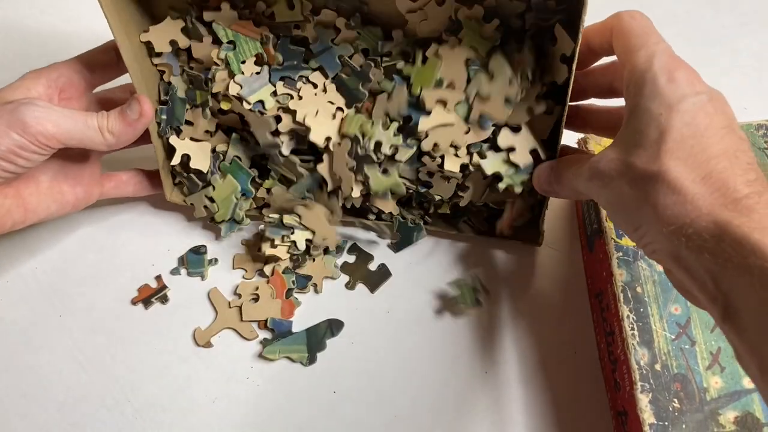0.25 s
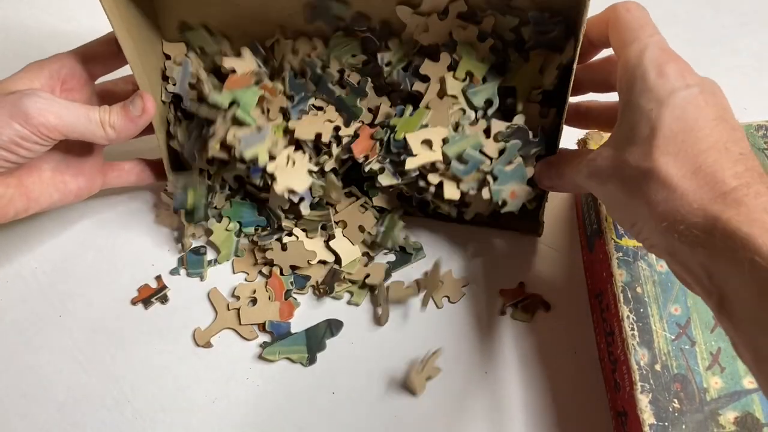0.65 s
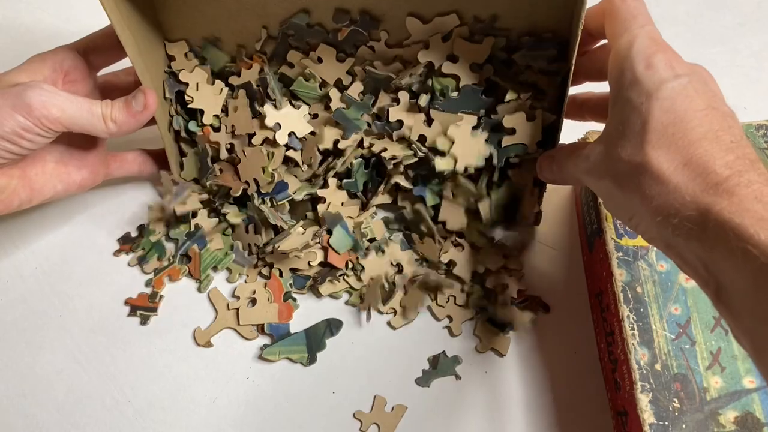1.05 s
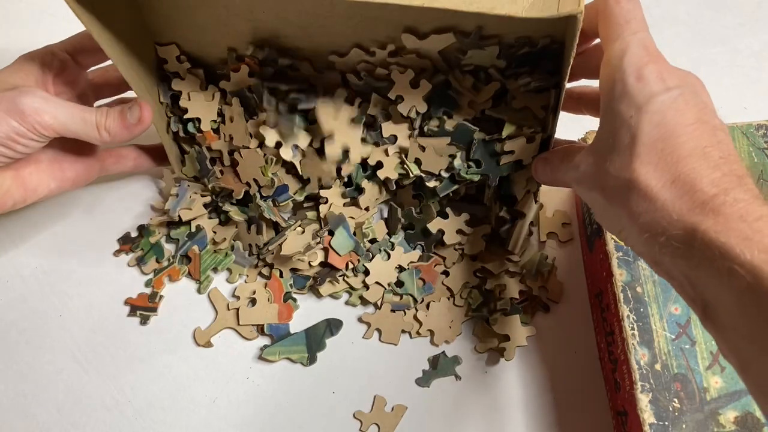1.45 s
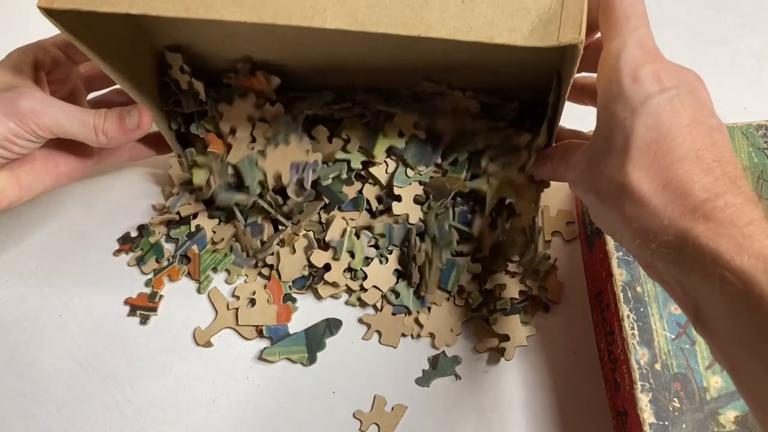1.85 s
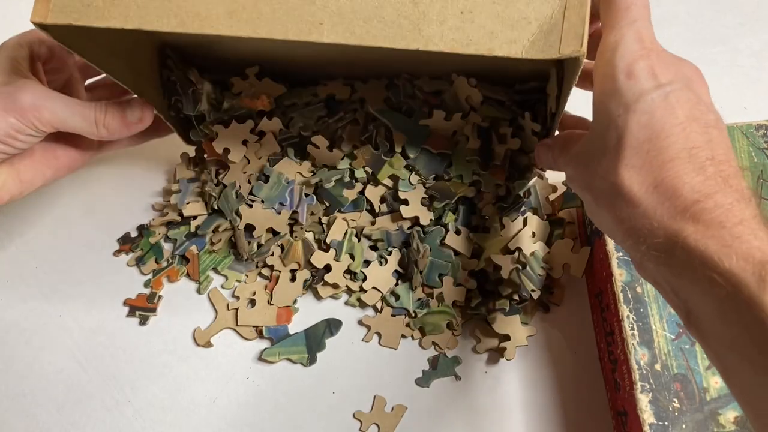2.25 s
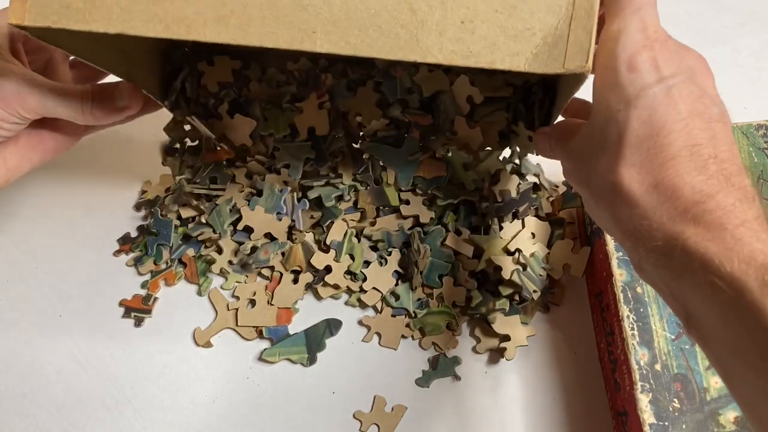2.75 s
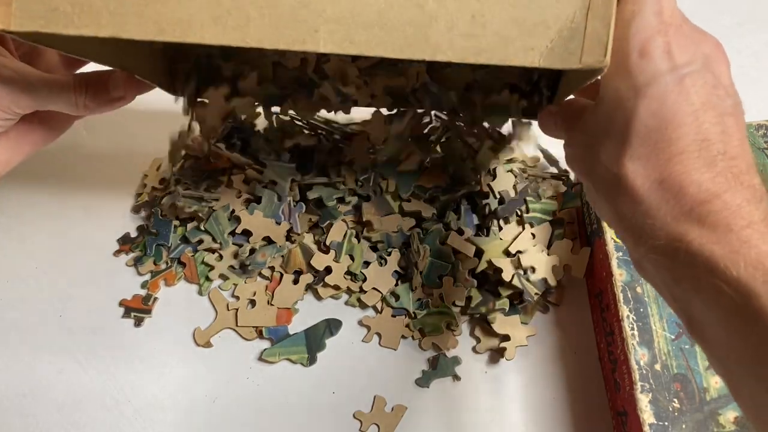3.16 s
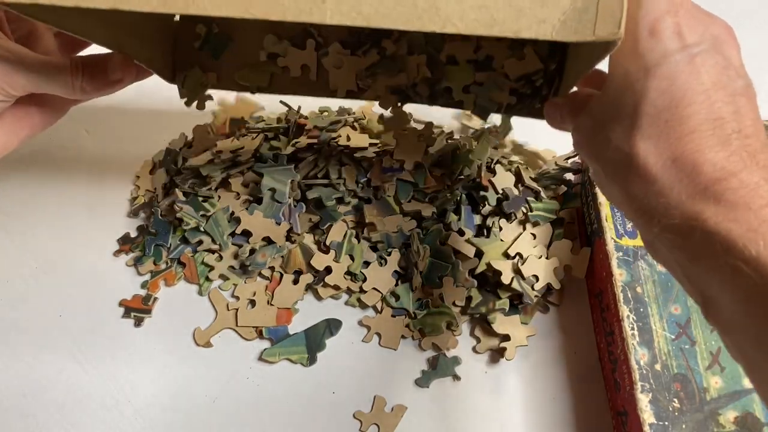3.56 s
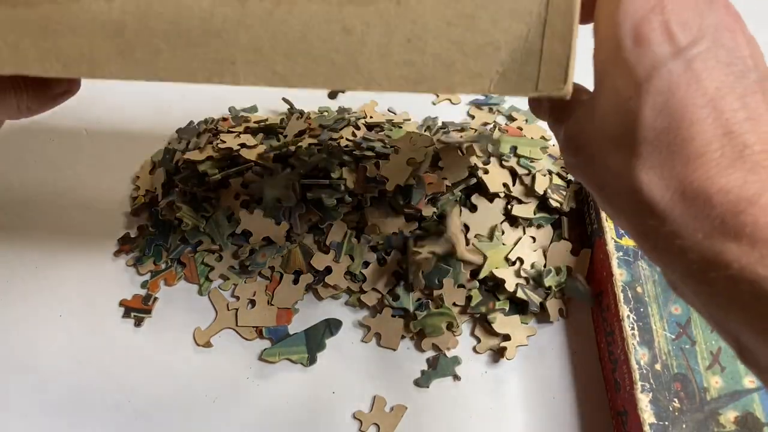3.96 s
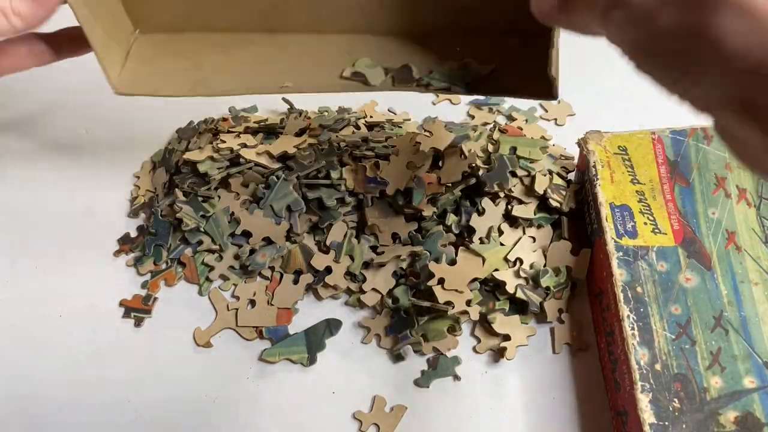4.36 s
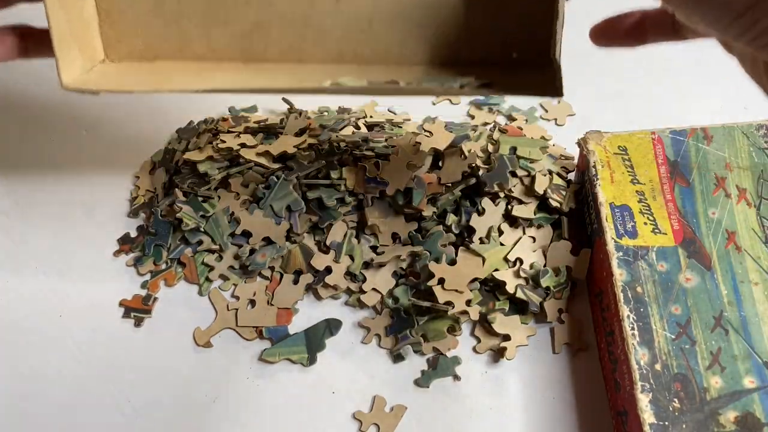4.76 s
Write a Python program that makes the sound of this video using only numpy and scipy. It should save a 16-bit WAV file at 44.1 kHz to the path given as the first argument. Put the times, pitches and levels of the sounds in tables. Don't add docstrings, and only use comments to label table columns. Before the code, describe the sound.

Dry, close sound of thin cardboard pieces pouring from a cardboard box onto a table in a quiet small room. From 0 to 0.5 s, scattered crisp claps come in little bunches, with one much louder snap at about 0.5 s. From 0.6 to 1.1 s the pieces break loose in a dense, pattering avalanche, the fullest passage. It drops to a sparse trickle and soft papery rustle from 1.2 to 2.4 s, with a hollow box knock near 2.1 s. From 2.5 to 3.3 s a gentler slide of pieces lands on the heap, duller and softer, swelling slightly towards its end. After a lull, the almost empty box is shaken in hollow rattling jolts at about 3.6, 3.8 and 3.95 s. From 4.2 s only faint ticks and tiny scrapes remain over low rumble, slight hum and hiss.

```python
import sys
import numpy as np
from scipy import signal
from scipy.fft import rfft, irfft, next_fast_len
from scipy.io import wavfile
from scipy.ndimage import uniform_filter1d, map_coordinates

SR = 44100
rng = np.random.default_rng(int(sys.argv[2]) if len(sys.argv) > 2 else 0)


def persist_wave(psi):
    counts = np.round(np.clip(psi, -1, 1) * 32767).astype(np.int16)
    wavfile.write(sys.argv[1], SR, np.atleast_2d(counts).T)


def convert_level_to_amplitude(level_db):
    exponent = np.asarray(level_db, float) / 20
    return 10 ** exponent


N = 220498

# pitch_hz [Hz], level_db [dB per Hz]
FIBRES = [(1800, -30), (3800, 8), (5900, -6.5), (7400, 0), (12000, 0), (15200, -5.5), (16200, -14)]
# time_s [s], weight_db [dB]
CONTACT = [(0, -10), (1.2, 4), (1.5, 4), (2.0, 8.5), (2.15, 4), (3.5, 5.5), (3.66, -21), (4.15, -20.5),
           (5, -5.5)]
# start_s [s], peak_db [dB], pitch_hz [Hz]
SPILL = [(.0279, -17, 1920), (.0644, -36, 2130), (.0837, -32, 1880), (.1185, -26, 1530), (.1399, -35, 1730),
         (.1979, -31, 1850), (.2027, -16, 1940), (.2073, -11, 1840), (.2122, -9, 2150), (.2139, -11, 1640),
         (.2955, -25, 1810), (.3004, -10, 1860), (.3157, -14, 1670), (.3243, -21, 1890), (.3545, -24, 1990),
         (.3646, -22, 2100), (.382, -16, 1780), (.4096, -24, 1650), (.4201, -18, 1700), (.4416, -20, 1930),
         (.4554, -14, 2000), (.4618, -22, 1980), (.4806, -21, 1770), (.4993, -12, 1800), (.5089, 0, 1950),
         (.5315, -16, 1620), (.5391, -18, 1450), (.5485, -19, 2030), (.552, -17, 2150)]
# start_s [s], peak_db [dB], pitch_hz [Hz]
AVALANCHE = [(.6164, -18, 2080), (.6449, -17, 1750), (.6741, -22, 1790), (.6783, -13, 1820),
             (.6814, -14, 1960), (.7316, -18, 1700), (.7349, -18, 1870), (.7402, -18, 1980),
             (.7448, -15, 1780), (.7607, -13, 2270), (.7632, -15, 1630), (.7746, -19, 1910),
             (.7769, -18, 1940), (.7981, -20, 1750), (.8121, -18, 2040), (.8262, -8, 1900),
             (.8436, -9, 1780), (.8485, -18, 1860), (.8762, -16, 1960), (.8973, -13, 1820),
             (.9087, -13, 2210), (.9238, -16, 2340), (.9303, -8, 2030), (.9551, -16, 1800),
             (.9995, -19, 1810), (1.0094, -22, 1810), (1.0178, -22, 1940), (1.0405, -25, 1930),
             (1.0807, -25, 1900), (1.1531, -16, 2110)]
# start_s [s], peak_db [dB], pitch_hz [Hz]
TRICKLE = [(1.1867, -26, 1710), (1.2135, -24, 2190), (1.3213, -41, 1850), (1.3996, -27, 2360),
           (1.46, -30, 2120), (1.4844, -34, 2220), (1.4966, -34, 1960), (1.5172, -35, 2070),
           (1.6134, -28, 2110), (1.6248, -24, 1660), (1.7695, -25, 2200), (1.8322, -30, 1870),
           (1.8556, -32, 1520), (2.0978, -41, 990), (2.1622, -27, 1980), (2.2107, -35, 2320),
           (2.2269, -35, 2370), (2.2394, -35, 1770), (2.2602, -32, 2000), (2.2864, -28, 2560),
           (2.302, -27, 1770), (2.3136, -32, 1790), (2.3178, -29, 1470), (2.3522, -22, 2400),
           (2.3922, -26, 1840), (2.4068, -23, 2020), (2.419, -28, 1950), (2.4293, -31, 2010),
           (2.4416, -30, 1970), (2.468, -35, 2100)]
# start_s [s], peak_db [dB], pitch_hz [Hz]
SLIDE = [(2.4894, -24, 1930), (2.4961, -26, 2360), (2.5, -25, 2490), (2.503, -24, 1700), (2.528, -30, 2070),
         (2.582, -19, 2110), (2.5901, -24, 2070), (2.5936, -26, 1730), (2.5979, -21, 1840),
         (2.6321, -21, 2060), (2.7105, -33, 2310), (2.7191, -20, 2540), (2.7241, -25, 2600),
         (2.7821, -31, 2050), (2.7927, -21, 2890), (2.7998, -26, 2710), (2.8344, -28, 2560),
         (2.9435, -30, 2120), (2.9533, -21, 2460), (3.02, -28, 2080), (3.0328, -18, 1950),
         (3.0357, -22, 2290), (3.0649, -26, 1890), (3.16, -26, 2580), (3.1957, -24, 2520),
         (3.1991, -23, 2120), (3.2039, -25, 1870), (3.23, -24, 3110), (3.2761, -21, 2010),
         (3.2802, -24, 2040)]
# start_s [s], peak_db [dB], pitch_hz [Hz]
SHAKEN = [(3.4904, -39, 2020), (3.544, -32, 1500), (3.6224, -30, 1900), (3.6359, -19, 2110),
          (3.6445, -17, 2070), (3.6492, -20, 1520), (3.652, -22, 1540), (3.7064, -27, 1500),
          (3.7369, -27, 1550), (3.7444, -28, 1530), (3.7844, -18, 1860), (3.7864, -19, 1860),
          (3.7985, -17, 1460), (3.9301, -26, 1700), (3.9358, -25, 2040), (3.9389, -15, 1770),
          (3.9417, -16, 1830), (3.9559, -22, 1590), (4.0141, -29, 1960), (4.0518, -27, 2110),
          (4.1304, -34, 1810), (4.1329, -22, 2050), (4.1831, -33, 1800), (4.2206, -41, 2080),
          (4.3111, -44, 1450)]
# start_s [s], peak_db [dB], pitch_hz [Hz]
STRAYS = [(.3748, -25, 1680), (.4138, -24, 1850), (.4285, -25, 1880), (.6012, -25, 1540),
          (.6121, -24, 1850), (1.1061, -27, 2130), (1.1307, -30, 2240), (1.1958, -28, 2110),
          (1.2229, -31, 1750), (1.25, -35, 1650), (1.995, -42, 3300), (2.015, -41, 3400),
          (2.6102, -27, 1930), (2.625, -28, 2040), (3.2251, -26, 2000), (3.2479, -27, 1900),
          (3.311, -32, 2900), (3.894, -45, 4700), (4.12, -45, 1900), (4.2009, -45, 4030),
          (4.235, -56, 5130), (4.237, -52, 3400), (4.258, -58, 3500)]
LANDINGS = SPILL + AVALANCHE + TRICKLE + SLIDE + SHAKEN + STRAYS


def unit(x):
    return x / np.sqrt(np.mean(x ** 2) + 1e-20)


def along(points, hz):
    f, v = np.transpose(points)
    return np.interp(np.log(hz + 1), np.log(f + 1), v)


def curve(rows):
    s, value = np.transpose(rows)
    return np.interp(np.arange(N) / SR, s, value)


def wobble(rate):
    knots = rng.standard_normal(int(N * rate / SR) + 4)
    return map_coordinates(knots, [np.arange(N) * rate / SR])


def filtered(x, response):
    m = next_fast_len(N + SR // 2)
    return irfft(rfft(x, m) * response(np.fft.rfftfreq(m, 1 / SR)), m)[:N]


def noise(spectrum):
    return unit(filtered(rng.standard_normal(N), lambda hz: convert_level_to_amplitude(along(spectrum, hz)) * (hz > 3)))


def resonance(f, centre, width):
    return 1j * f * width / (centre * centre - f * f + 1j * f * width)


def place(s, shapes, lead):
    at = np.round(s * SR).astype(int)[:, None] + np.arange(shapes.shape[1]) - lead + SR
    return np.bincount(at.ravel(), shapes.ravel(), N + 2 * SR)[SR:SR + N]


def puffs(s, gain, hz, rise, fall, size=256):
    lead = size // 4
    cycles = hz[:, None] * (np.arange(size) - lead) / SR
    stretch, phase = rng.random((len(s), 2)).T
    swell = np.exp(-(cycles / rise) ** 2)
    decay = 1 / np.cosh(cycles / (fall * (0.55 + 0.7 * stretch[:, None])))
    shape = np.where(cycles < 0, swell, decay)
    tone = np.cos(2 * np.pi * (cycles + phase[:, None]))
    return place(s, gain[:, None] * shape * tone, lead)


def room_tone():
    # pitch_hz [Hz], level_db [dB per Hz]
    air = [(100, -38.5), (170, 1.5), (272, -4.5), (322, -13), (693, -24.5), (762, -21), (868, -21.5),
           (15000, -31.5)]
    # pitch_hz [Hz], level_db [dB per Hz]
    rumble = [(15, -35), (25, -1), (43, -9), (70, -2), (124, -7.5), (170, -20.5), (220, -48), (370, -120)]
    # time_s [s], level_db [dB]
    traffic = [
        (0.0, -56),
        (1.24, -50),
        (2.56, -55.5),
        (4.68, -55),
        (5.0, -57.5),
    ]
    # time_s [s], level_db [dB]
    sway = [
        (0.0, -55.5),
        (3.16, -57.5),
        (3.83, -41.5),
        (4.41, -49.5),
        (5.0, -53),
    ]
    t = np.arange(N) / SR
    hum = convert_level_to_amplitude(-61.0 + 2.3 * wobble(13.0)) * np.sin(2 * np.pi * 120 * t + 0.29 * wobble(14.0))
    pushed_air = convert_level_to_amplitude(curve(sway)) * noise([(3, -3), (8, -0.5), (18, -7.5), (28, -19.5), (60, -93.5)])
    hiss = convert_level_to_amplitude(-72.0) * noise(air)
    building = convert_level_to_amplitude(curve(traffic) - 0.13) * noise(rumble)
    return hiss + building + hum + pushed_air


def scrape():
    # start_s [s], length_s [s], level_db [dB]
    rubs = [
        (4.257, 0.2, -74),
        (4.591, 0.082, -74.5),
        (4.7, 0.06, -73.5),
    ]
    # start_s [s], length_s [s], level_db [dB]
    low_rubs = [
        (4.36, .11, -78),
        (4.63, .06, -87),
    ]
    # start_s [s], length_s [s], level_db [dB]
    high_rubs = [
        (4.24, .16, -81),
    ]
    edge_s, ring_width_hz, flutter_db = 0.015, 220, 2
    t = np.arange(N) / SR
    flutter = convert_level_to_amplitude(flutter_db * wobble(60))
    out = 0
    for ring_hz, strokes in [(1910, rubs), (1270, low_rubs), (3350, high_rubs)]:
        strength = 0
        for start, length, db in strokes:
            stroke = (np.tanh((t - start) / edge_s) - np.tanh((t - start - length) / edge_s)) / 2
            strength = strength + convert_level_to_amplitude(db) * stroke
        ring = filtered(rng.standard_normal(N), lambda f: resonance(f, ring_hz, ring_width_hz) ** 2)
        out = out + unit(ring) * strength
    return flutter * out


def jolts():
    # start_s [s], level_db [dB], t60_s [s]
    shaking = [
        (3.62, -27, 0.051),
        (3.631, -28, 0.23),
        (3.736, -30.5, 0.077),
        (3.774, -23.5, 0.17),
        (3.917, -34, 0.12),
        (3.93, -27, 0.09),
        (3.952, -34, 0.15),
        (4.0, -47, 0.27),
        (4.594, -68.5, 0.085),
    ]
    t = np.arange(N) / SR
    out = 0
    for start, db, t60 in shaking:
        after = np.maximum(t - start, 0)
        out = out + convert_level_to_amplitude(db - 60 * after / t60) * (1 - np.exp(-after / 0.0046))
    return out


def shakes():
    # pitch_hz [Hz], level_db [dB per Hz]
    rattle = [(190, -20), (330, 8), (650, 1), (920, -7), (1500, 8), (2600, -1), (5000, -26), (16000, -87)]
    return jolts() * unit(convert_level_to_amplitude(2.1 * wobble(400)) * noise(rattle))


def walls(f):
    # pitch_hz [Hz], width_hz [Hz], level_db [dB]
    modes = [(298, 223, -3), (420.5, 113, 3.5), (525, 98, -1), (650, 89, -0.5), (1030, 544, -8.5)]
    return sum((-1) ** k * convert_level_to_amplitude(db) * resonance(f, hz, width) for k, (hz, width, db) in enumerate(modes))


def knocks():
    # start_s [s], peak_db [dB], strongest wall pitch_hz [Hz]
    blows = [(0.115, -38, 443), (0.21, -28.5, 610), (0.312, -30, 666), (0.452, -36, 620),
             (0.496, -22.5, 684), (0.803, -32, 800), (1.171, -37.5, 352), (1.398, -39.5, 685),
             (2.095, -27, 434), (2.102, -32.5, 504), (2.131, -42.5, 515), (2.164, -44, 435),
             (2.212, -43.5, 382), (2.268, -41, 467), (2.355, -37, 650), (2.581, -42, 338),
             (3.096, -35.5, 365), (3.437, -39, 543), (3.499, -42, 463), (3.648, -26, 328),
             (3.704, -31.5, 425), (3.738, -30.5, 364), (3.854, -33.5, 442), (3.931, -38, 288),
             (3.953, -32, 310), (4.016, -37, 480), (4.035, -34, 496)]
    s, db, hz = np.transpose(blows)
    wall = puffs(s + 0.003, convert_level_to_amplitude(db - 2.5), hz, rise=0.55, fall=1.7, size=2048)
    lower_wall = puffs(s + 0.0051, convert_level_to_amplitude(db - 13), 0.78 * hz, rise=0.8, fall=1.3, size=2048)
    lingering = wobble(90) * puffs(s + 0.00846, convert_level_to_amplitude(db - 19), 1.04 * hz, rise=1.5, fall=5, size=4096)
    overtone = puffs(s + 0.003, convert_level_to_amplitude(db - 16), 1.9 * hz, rise=0.6, fall=1.2, size=2048)
    return wall + lower_wall + lingering + overtone


def motion(stir_db):
    # time_s [s], level_db [dB]
    flow = [(0, -54.5), (.18, -52), (.32, -39), (.46, -45), (.53, -39), (.93, -29.5), (1.05, -39),
            (1.32, -57.5), (1.86, -44.5), (2.07, -62), (2.32, -48), (2.62, -56.5), (2.9, -50), (3.2, -37.5),
            (3.5, -53.5), (3.95, -52.5), (4.3, -75), (5, -84.5)]
    stir_t60_s = 0.15
    s, db, _ = np.transpose(LANDINGS)
    fading = convert_level_to_amplitude(-60 * np.arange(SR // 4) / SR / stir_t60_s) ** 2
    stir = place(s, convert_level_to_amplitude(db + stir_db)[:, None] ** 2 * fading, lead=0)
    neighbours = convert_level_to_amplitude(0.84 * curve(CONTACT)) ** 2
    return 10 * np.log10(convert_level_to_amplitude(curve(flow)) ** 2 + stir * neighbours)


def patchy(x):
    z = signal.stft(x, nperseg=256)[2]
    field = uniform_filter1d(rng.standard_normal(z.shape), size=12, axis=0)
    field = uniform_filter1d(field, size=8, axis=1)
    return signal.istft(z * convert_level_to_amplitude(3 * unit(field)), nperseg=256)[1][:N]


def heap():
    contact_db = curve(CONTACT)
    patter_db = motion(-19.5)
    rustle_db = -64.5 + 0.57 * (patter_db + 46) + contact_db
    drum_db = -54 + 0.66 * (motion(-24.5) + 47.5) - 0.26 * np.maximum(contact_db, -5)
    drum = convert_level_to_amplitude(drum_db) + convert_level_to_amplitude(-13) * jolts()

    when, size, pitch, bend = rng.random((6000, 4)).T
    clump = 1.7 * wobble(60)
    hz = 1900 * np.exp(0.35 * (pitch + bend - 1) + 0.75 * pitch ** 3)
    size_db = np.minimum(-4.5 * np.log(size + 1e-4), 4)
    size_db -= 16 * np.maximum(np.log2(hz / 2400), 0)
    fall = 1.4 * np.maximum(hz / 2000, 1)[:, None]
    grains = puffs(when * (N - 1) / SR, convert_level_to_amplitude(size_db), hz, rise=0.8, fall=fall, size=192)
    patter = convert_level_to_amplitude(patter_db - 5.5) * unit(convert_level_to_amplitude(clump) * grains)

    slips = convert_level_to_amplitude(0.35 * clump + 2.5 * wobble(300) + 1.2 * wobble(14))
    rustle = convert_level_to_amplitude(rustle_db - 8.0) * unit(slips * patchy(noise(FIBRES)))
    shaking = convert_level_to_amplitude(0.25 * clump + 2.2 * wobble(120)) * rng.standard_normal(N)
    return patter + rustle + drum * unit(filtered(shaking, walls))


def singles():
    # start_s [s], peak_db [dB], pitch_hz [Hz]
    lone = [(0.3346, -30, 1810), (0.3456, -29, 1670), (0.4254, -28, 2020), (0.4675, -26, 2000),
            (0.5693, -26, 1710), (0.6234, -29, 1670), (0.6985, -26, 2000), (0.7076, -24, 1880),
            (0.7119, -24, 2000), (0.805, -26, 2130), (0.8181, -25, 1840), (0.862, -23, 1910),
            (0.9633, -23, 1620), (0.9686, -25, 1650), (0.9903, -26, 1790), (1.0142, -25, 1770),
            (1.0757, -32, 2010), (1.0829, -26, 1860), (1.1691, -30, 1970), (1.2041, -31, 1920),
            (0.6045, -26, 1600), (3.2421, -31, 1990), (1.4561, -38, 2010), (1.4659, -35, 2060),
            (1.491, -38, 2120), (1.6296, -38, 1870), (1.7276, -39, 1700), (1.7361, -40, 1610),
            (1.7663, -33, 2070), (1.8036, -37, 1780), (1.8251, -34, 1920), (1.9254, -42, 2000),
            (2.5738, -35, 2180), (2.7243, -31, 2130), (2.7517, -37, 2180), (2.8773, -41, 2050),
            (2.8894, -39, 2190), (3.057, -31, 1860), (3.0766, -32, 1930), (3.1009, -30, 1990),
            (3.1087, -32, 1970), (3.1879, -32, 1560), (3.2086, -27, 2060), (3.2162, -27, 2200),
            (3.3243, -38, 1860), (3.3547, -40, 1840), (3.6623, -27, 1550), (3.4107, -38, 1960),
            (3.4281, -39, 1970), (3.4582, -42, 1720), (3.6682, -26, 1650), (3.8504, -35, 1840),
            (4.0376, -37, 1590), (4.0723, -43, 1860)]
    # start_s [s], peak_db [dB], pitch_hz [Hz]
    clumps = [(0.2937, -36, 1070), (0.3277, -30, 1080), (0.4558, -31, 970), (0.6841, -33, 980),
              (0.7332, -31, 960), (0.7446, -29, 1140), (0.7632, -30, 1170), (0.8146, -28, 970),
              (0.8972, -30, 1140), (0.9705, -32, 1090), (1.1763, -39, 870), (1.435, -44, 1090),
              (2.5304, -42, 1190), (2.592, -38, 1210), (2.6329, -41, 1130), (2.6604, -44, 1050),
              (2.7195, -44, 1140), (2.7924, -39, 1080), (3.0324, -37, 1190), (3.074, -38, 1160),
              (3.1, -39, 1140), (3.2166, -39, 1180), (3.2765, -37, 1180), (3.4581, -45, 1110),
              (3.5435, -40, 1120), (3.6575, -33, 1200), (3.7483, -35, 1170), (3.9404, -30, 1200),
              (4.0455, -40, 950)]
    # start_s [s], peak_db [dB]
    corners = [(.028, -34), (.0637, -45), (.2124, -21), (.4188, -37), (.4804, -32), (.5385, -35),
               (.5696, -41), (.6038, -40), (.6171, -37), (.6813, -23), (.731, -23), (.7361, -33),
               (.7607, -22), (.7762, -31), (.8052, -31), (.812, -32), (.8178, -31), (.8531, -25),
               (.8759, -28), (.8978, -21), (.9499, -34), (.9553, -29), (.9625, -35), (.9676, -34),
               (.9996, -28), (1.1278, -41), (1.1805, -43), (1.4949, -46), (1.6131, -38), (1.624, -34),
               (1.8554, -44), (2.1623, -41), (2.2268, -43), (2.2868, -36), (2.3011, -35), (2.306, -38),
               (2.3521, -29), (2.3922, -40), (2.4067, -36), (2.496, -35), (2.5, -32), (2.5739, -41),
               (2.5911, -37), (2.5968, -34), (2.6045, -36), (2.6105, -37), (2.7045, -41), (2.7516, -39),
               (2.776, -40), (2.782, -37), (3.0051, -43), (3.0356, -33), (3.0737, -41), (3.0994, -40),
               (3.16, -32), (3.1958, -30), (3.2019, -33), (3.2157, -35), (3.2242, -35), (3.2801, -34)]
    # start_s [s], peak_db [dB]
    last_corners = [
        (3.4475, -47),
        (3.5437, -43),
        (3.6232, -38),
        (3.6444, -29),
        (3.6493, -32),
        (3.7382, -35),
        (3.9297, -33),
        (3.9418, -30),
        (3.9552, -36),
    ]
    # start_s [s], peak_db [dB]
    tips = [(.0273, -45), (.419, -45), (.4988, -35), (.678, -37), (.6822, -30), (.7401, -43), (.7641, -44),
            (.7747, -38), (.8122, -44), (.8255, -40), (.8486, -44), (.8534, -35), (.876, -37), (.9093, -30),
            (.9233, -38), (.9415, -40), (.9646, -44), (.9864, -43), (1.3995, -48), (1.4593, -42),
            (2.5907, -41), (2.7106, -46), (2.7193, -37), (2.7929, -40), (2.8346, -42), (2.9525, -43),
            (3.0671, -45), (3.1957, -36), (3.2018, -41), (3.2089, -43), (3.23, -34), (3.2801, -35),
            (3.5478, -43), (3.9353, -44), (3.939, -42), (3.956, -43)]
    out = 0
    for rows, trim_db, rise, fall in [(lone, 1.5, 0.95, 1.2), (clumps, 2.5, 0.7, 0.9)]:
        s, db, hz = np.transpose(rows)
        out = out + puffs(s, convert_level_to_amplitude(db + trim_db), hz, rise=rise, fall=fall, size=512)
    for rows, centre_hz, rise, fall in [(corners + last_corners, 3050, 0.9, 1.3), (tips, 4050, 1.5, 2.2)]:
        s, db = np.transpose(rows)
        hz = centre_hz * np.exp(0.05 * rng.standard_normal(len(s)))
        out = out + puffs(s, convert_level_to_amplitude(db + 2.5), hz, rise=rise, fall=fall)
    return out


def ticks(s, db):
    t = np.arange(256) / SR
    envelope = convert_level_to_amplitude(-60 * t / 0.0074) * (1 - np.exp(-t / 0.0001))
    crack = rng.standard_normal((len(s), len(t))) * envelope
    return filtered(place(s, convert_level_to_amplitude(db + 7.5)[:, None] * crack, lead=30), lambda f: convert_level_to_amplitude(along(FIBRES, f)))


def claps():
    # start_s [s], level_db [dB]
    edge_strikes = [(0.0728, -50.5), (0.202, -47), (0.208, -40), (.461, -45), (.48, -39), (.731, -52),
                    (.8125, -51), (.8621, -46), (.9398, -46), (.9615, -48), (1.08, -53), (1.1038, -53),
                    (1.176, -56), (3.955, -49), (0.761, -49), (0.845, -48), (0.907, -40.5), (0.9285, -35),
                    (0.932, -43.5), (1.403, -52.5), (1.459, -54), (2.4993, -48.5), (3.0315, -56),
                    (3.2804, -45.5), (3.4062, -46), (3.548, -51.5), (3.6406, -38.5), (3.701, -48.5),
                    (3.789, -47), (3.798, -41.5), (3.893, -59), (3.94, -43.5), (3.9611, -47), (4.1636, -61),
                    (4.2462, -58), (4.312, -61), (4.597, -66), (4.606, -67), (4.614, -68)]
    s, db, hz = np.transpose(LANDINGS)
    late, size, bend = rng.standard_normal((len(s), 3)).T
    s = np.r_[s, s + 0.0017 * np.exp(0.4 * late)]
    db = np.r_[db, db - 12 + 2.5 * size]
    hz = np.r_[hz, hz * np.exp(0.12 * bend)]

    brief = np.maximum(hz ** 2 / 2600 ** 2, 1)[:, None]
    slap, bend = rng.standard_normal((len(s), 2)).T
    body = puffs(s, convert_level_to_amplitude(db), hz, rise=0.95 * brief, fall=1.15 * brief)
    slap_gain = convert_level_to_amplitude(db - 17 + 2 * slap) / brief[:, 0] ** 2
    body += puffs(s - 0.0002, slap_gain, 1.55 * hz * np.exp(0.1 * bend), rise=0.8, fall=1.6)
    edge_hz = 2.15 * np.minimum(hz, 2300) * np.exp(-0.1 * bend)
    body += puffs(s - 0.0003, convert_level_to_amplitude(db - 36 - 3 * slap), edge_hz, rise=1.1, fall=1.6)

    for delay_s, rock_db in [(0.0018, -15), (0.004, -22)]:
        late, size, bend = rng.standard_normal((len(s), 3)).T
        rock_s = s + delay_s * np.exp(0.25 * late)
        body += puffs(rock_s, convert_level_to_amplitude(db + rock_db + 3 * size), hz * np.exp(0.15 * bend), rise=0.9, fall=1.3)
    return body + ticks(s, np.minimum(db, -9) - 36.5) + ticks(*np.transpose(edge_strikes))


def room(x):
    # pitch_hz [Hz], t60_s [s]
    ring_times = [(200, 0.3), (2000, 0.25), (10000, 0.095)]
    out, step = np.zeros(N + SR), SR // 4
    for i in range(0, N, step):
        hz, t, z = signal.stft(rng.standard_normal(SR // 3), SR, nperseg=256)
        fade = convert_level_to_amplitude(-60 * t / along(ring_times, hz)[:, None])
        tail = signal.istft(z * fade, SR, nperseg=256)[1]
        wet = signal.fftconvolve(x[i:i + step], tail / np.linalg.norm(tail))
        out[i + 200:][:len(wet)] += wet[:len(out) - i - 200]
    return out[:N]


def scene():
    near = claps() + knocks()
    near += convert_level_to_amplitude(-19) * room(near)
    return (near + heap() + shakes() + scrape() + room_tone() + singles())[None]


def top_cut(x):
    return signal.sosfilt(signal.butter(12, 16510, fs=SR, output="sos"), x)


def record(dry):
    # pitch_hz [Hz], level_db [dB]
    mic = [(10, 3.5), (14500, -1.5), (15700, -2), (16200, -24), (17000, -64)]
    ceiling, hardness = 0.5, 8
    held = dry[0] / (1 + np.abs(dry[0] / ceiling) ** hardness) ** (1 / hardness)
    mix = filtered(held, lambda f: convert_level_to_amplitude(along(mic, f)))[None]
    return top_cut(mix)


dry = scene()
out = record(dry)
persist_wave(out)
```